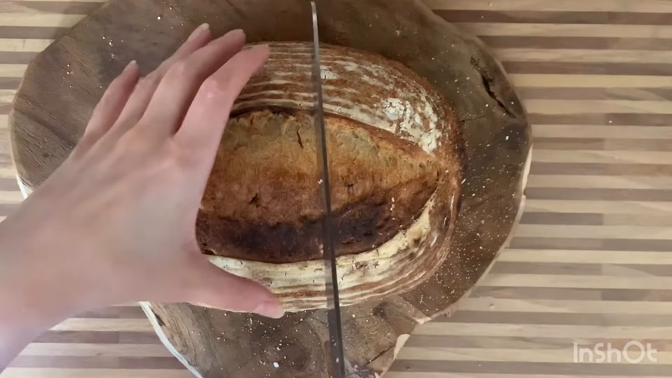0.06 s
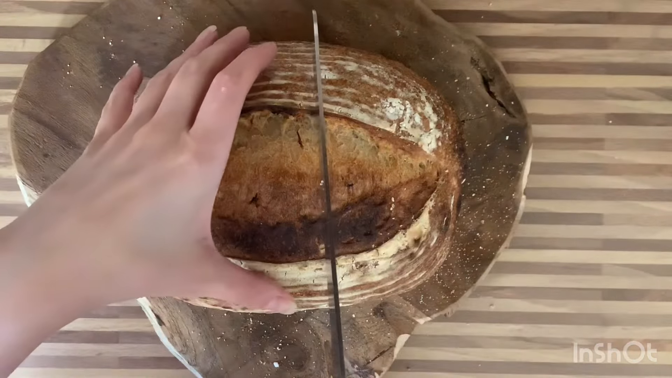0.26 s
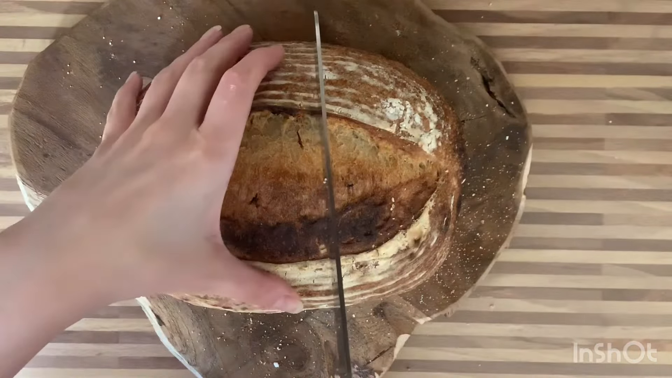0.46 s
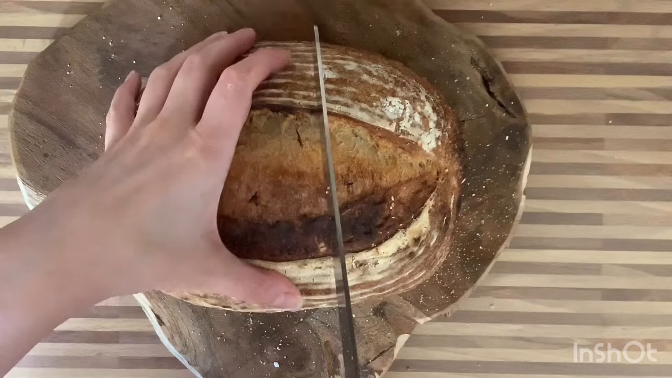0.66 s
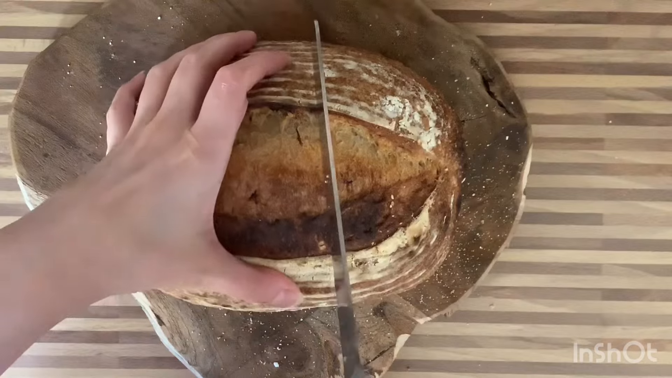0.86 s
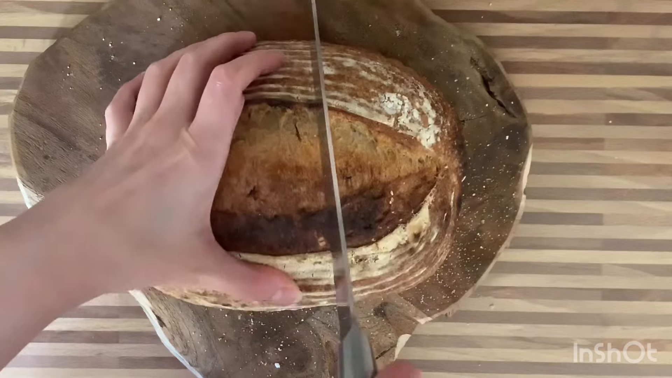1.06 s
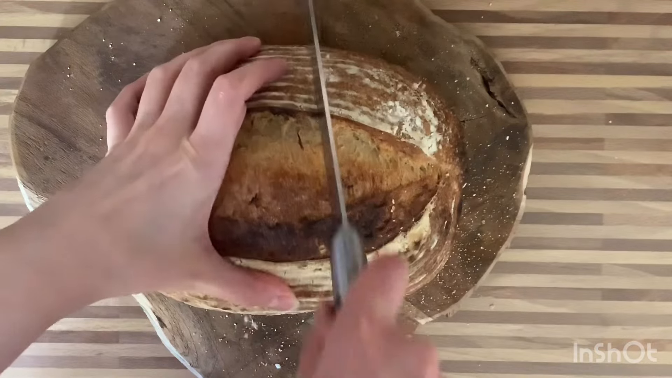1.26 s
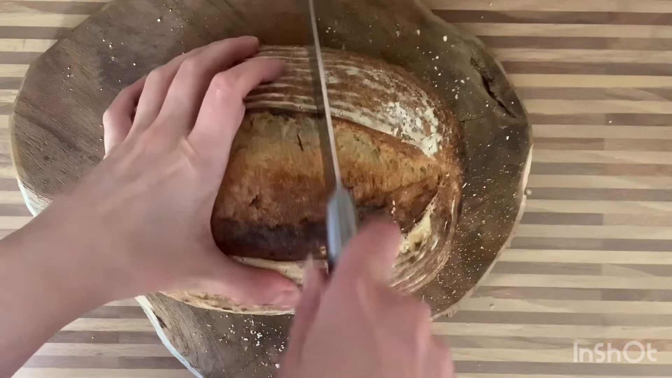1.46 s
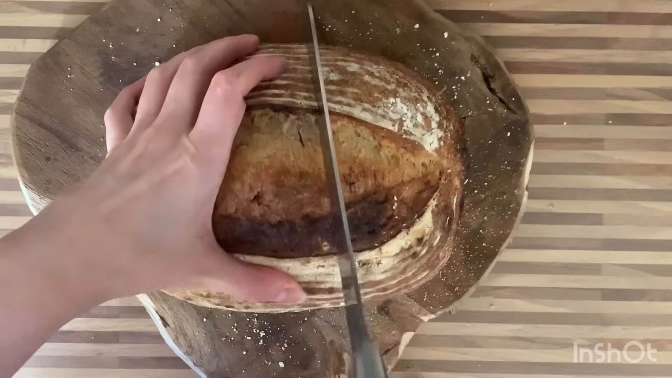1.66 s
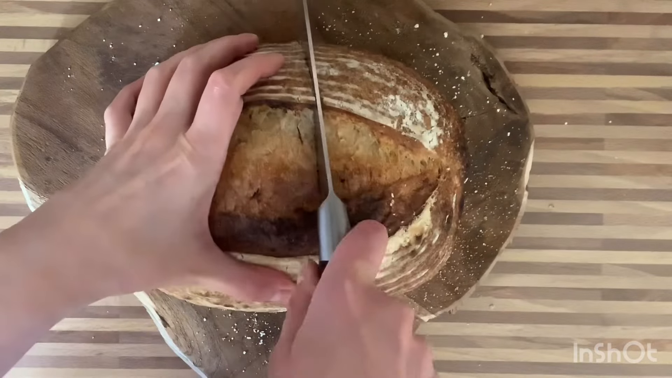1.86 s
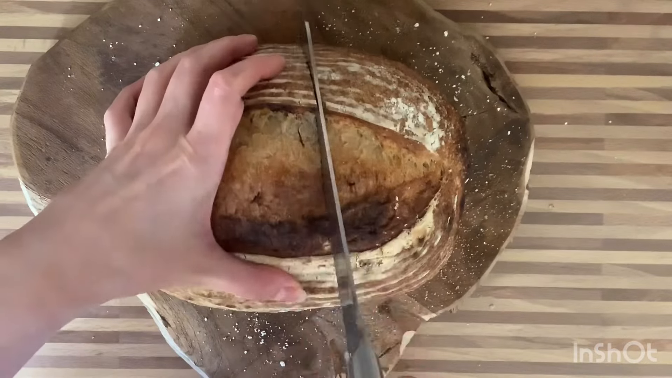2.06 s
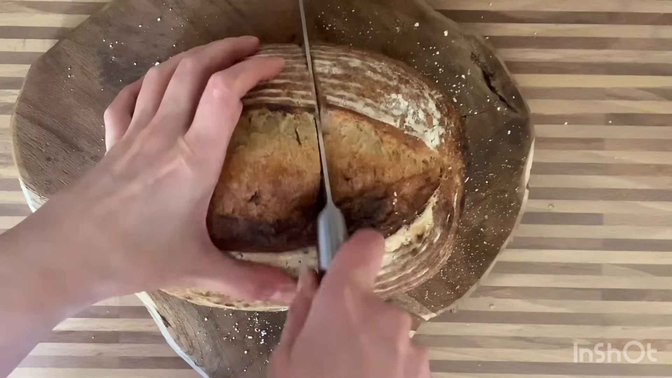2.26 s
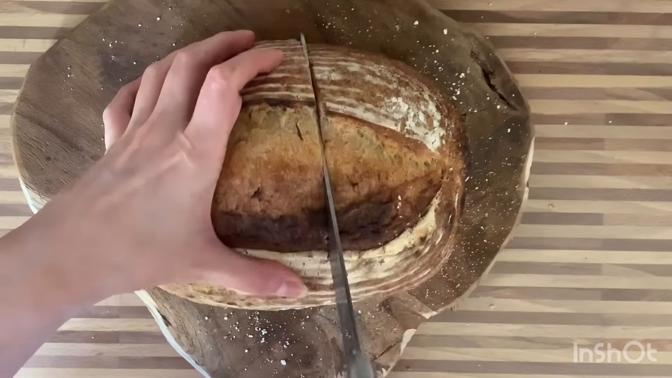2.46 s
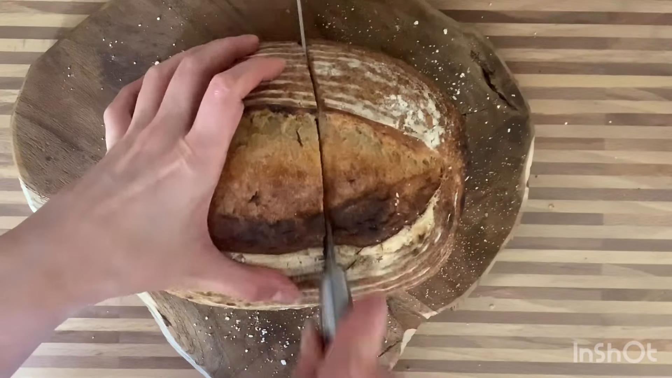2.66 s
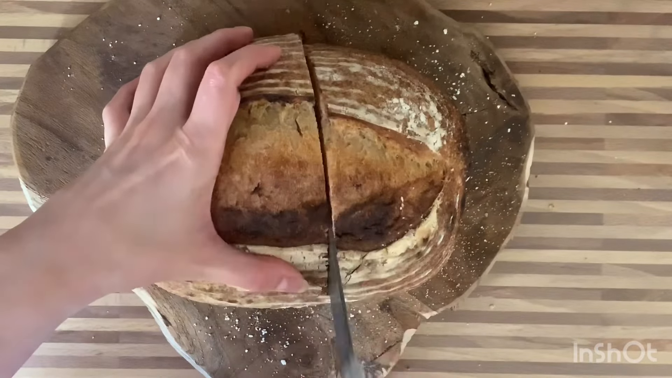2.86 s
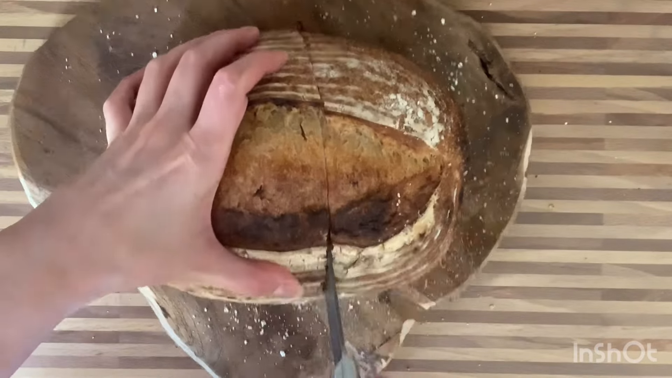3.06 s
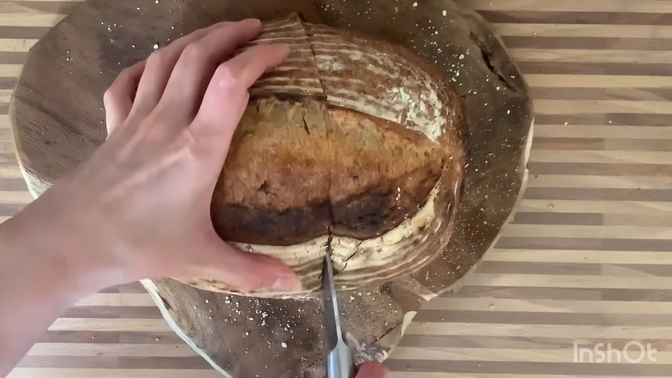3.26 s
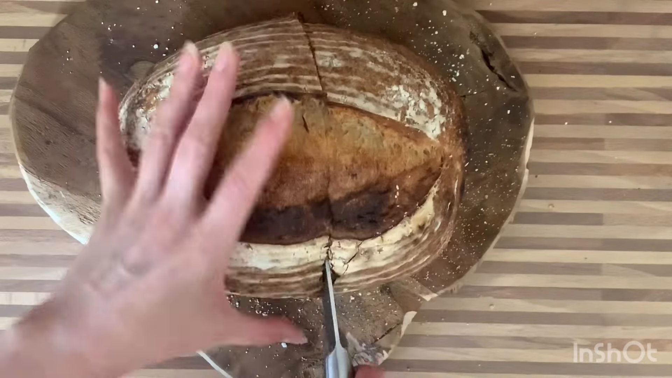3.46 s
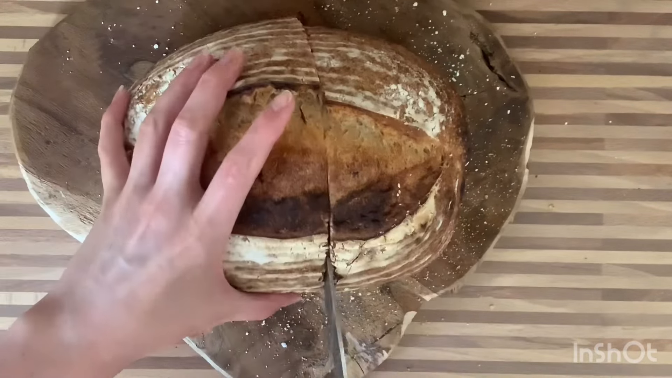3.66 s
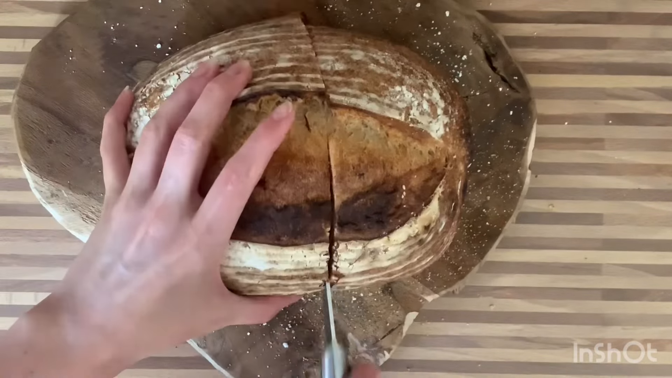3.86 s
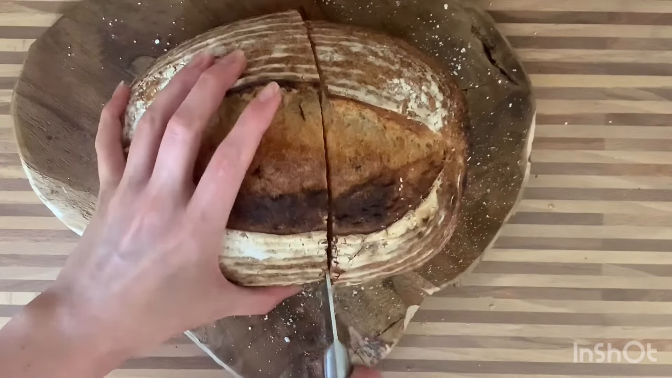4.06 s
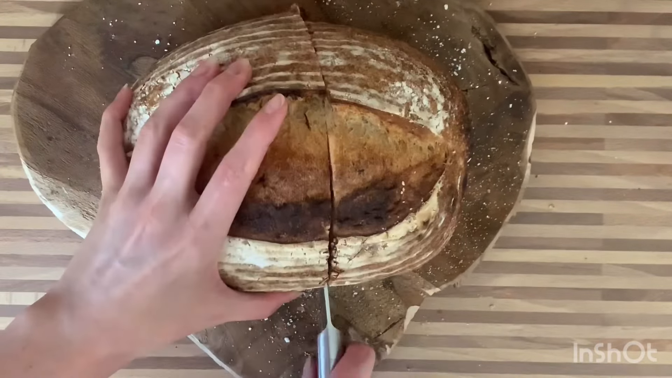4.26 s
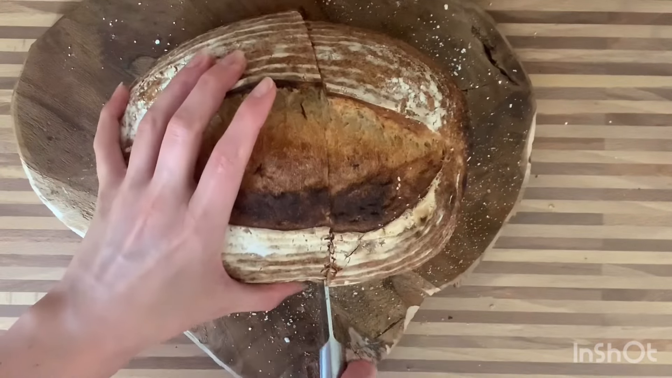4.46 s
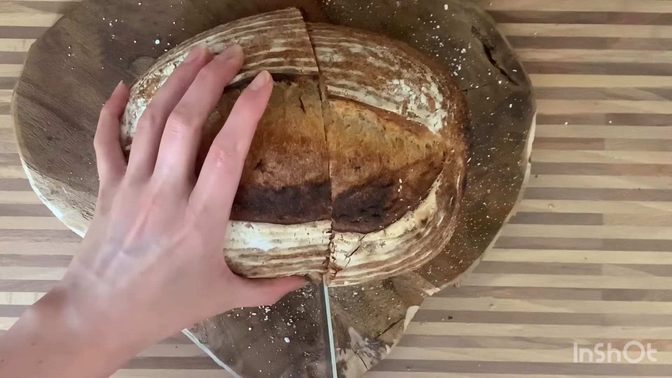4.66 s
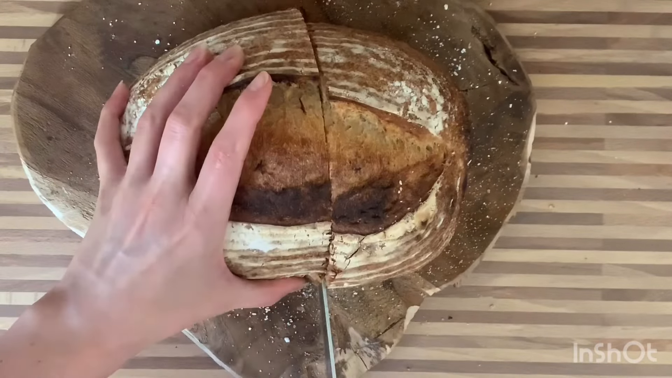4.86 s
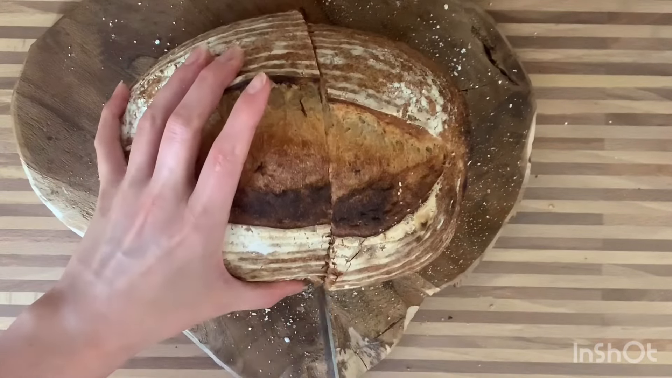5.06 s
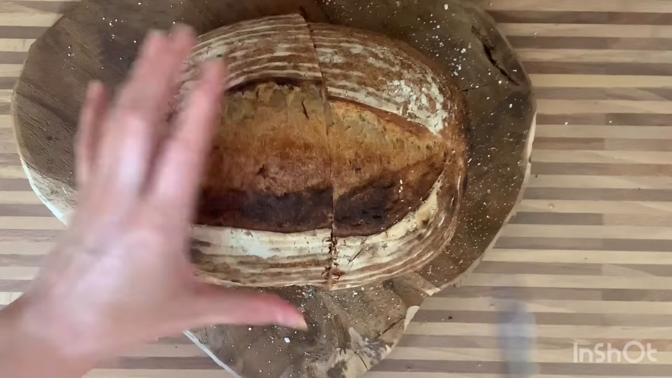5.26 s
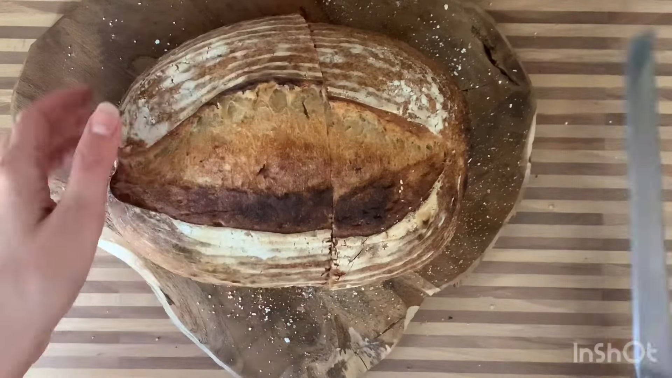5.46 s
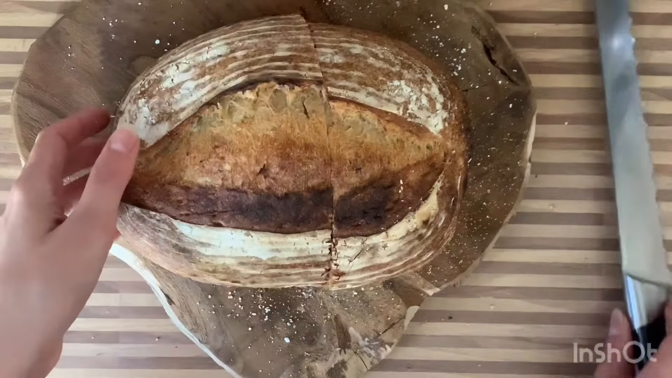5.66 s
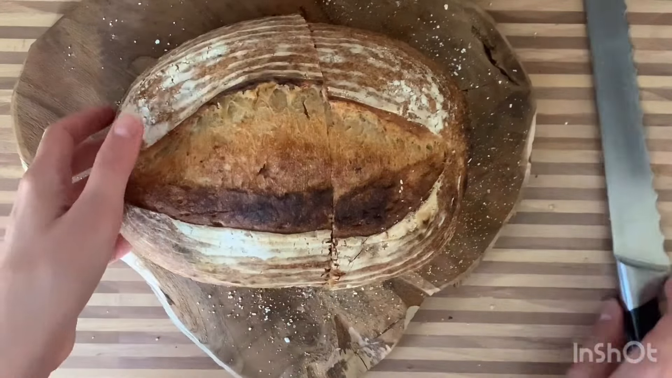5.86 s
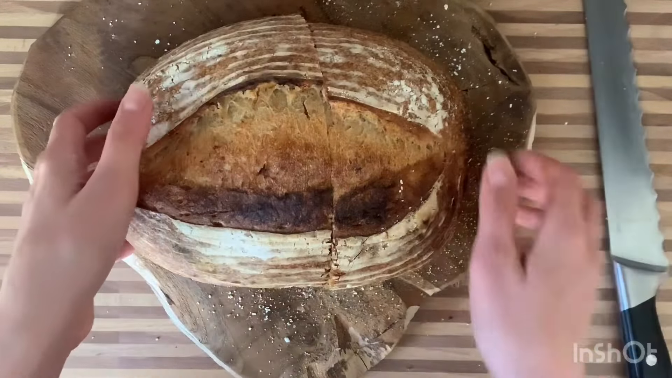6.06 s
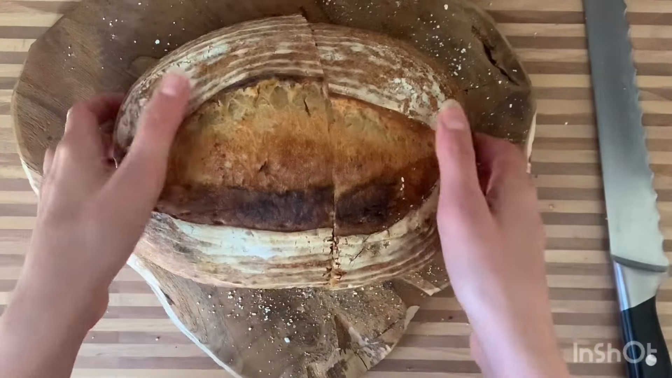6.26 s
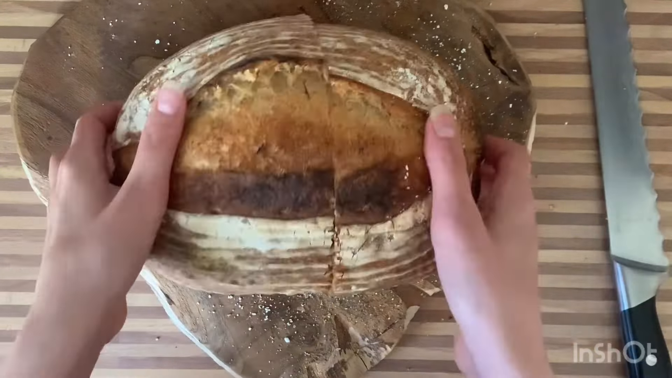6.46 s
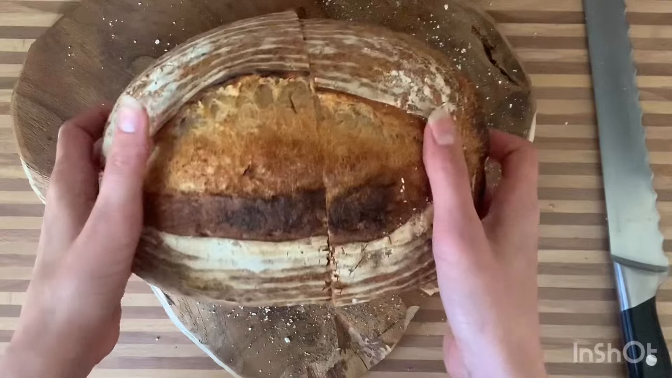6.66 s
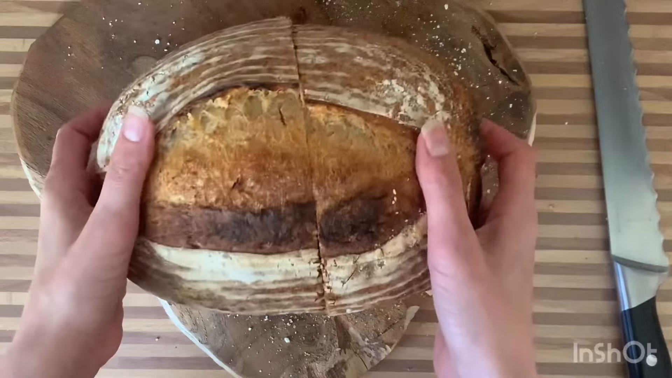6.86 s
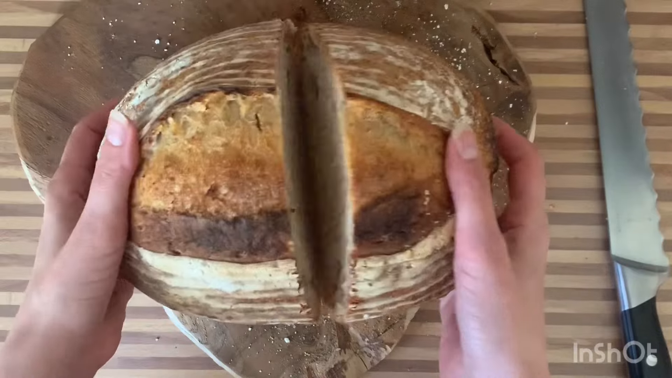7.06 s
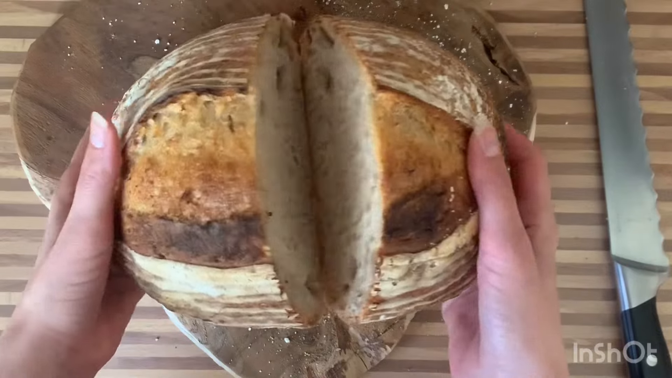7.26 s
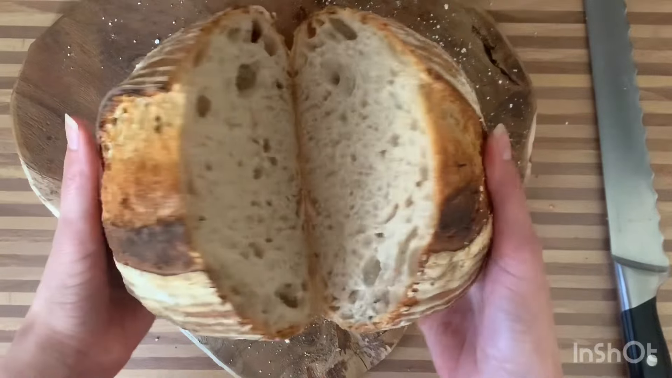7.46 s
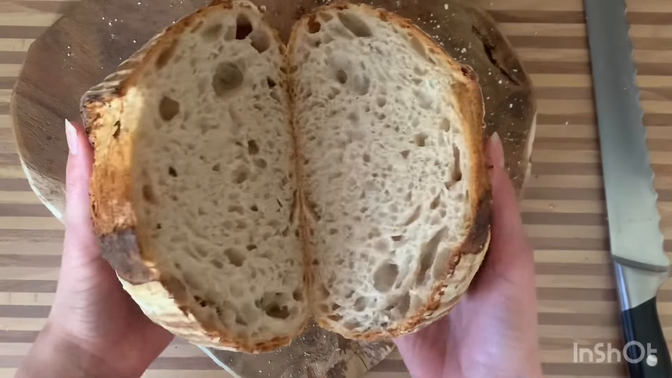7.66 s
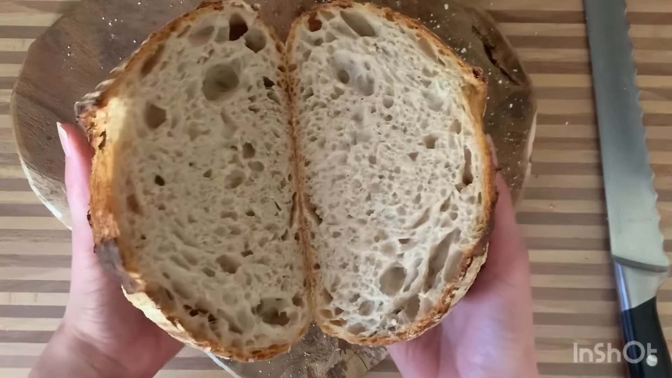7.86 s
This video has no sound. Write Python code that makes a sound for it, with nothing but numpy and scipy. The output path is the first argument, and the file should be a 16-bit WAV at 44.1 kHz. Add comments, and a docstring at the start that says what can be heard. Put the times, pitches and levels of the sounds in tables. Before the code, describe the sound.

A serrated knife saws through a crackling bread crust on a wooden board, clatters down on the worktop, then the loaf is softly pulled apart.

```python
"""A serrated knife saws through a crusty loaf on a wooden board in a kitchen.
Bursts of random clicks splinter the crust, ring the blade faintly and shake the loaf, which thuds.
The knife is laid on the worktop with a clatter of clicks fed into steel and wood tones.
Then two hands pull the halves apart: soft filtered noise with small crackles.
Echoes, a quiet background hush and a pair of close microphones complete the sound."""
import sys
import numpy as np
from scipy import signal
from scipy.fft import rfft, irfft
from scipy.io import wavfile
from scipy.ndimage import uniform_filter1d

SR = 44100
rng = np.random.default_rng(int(sys.argv[2]) if len(sys.argv) > 2 else 0)


def waveform_to_disk(signal):
    """Save audio, clipped to [-1, 1], as 16-bit WAV at the path in sys.argv[1]."""
    frames = np.transpose(np.atleast_2d(signal))
    scaled = np.clip(frames, -1, 1) * 32767
    samples = np.round(scaled).astype(np.int16)
    wavfile.write(sys.argv[1], SR, samples)


N = 349713

# Levels in all tables are relative: the functions below mix them with further gains.
# Low rustle of the hand holding the loaf. Each row: time in seconds, level in dB.
GRIP_LEVEL = [(0, -60.5), (0.75, -54.5), (5.6, -62.5), (6.1, -52)]
# Hands take hold of the loaf, part the halves and turn them up.
# Each row: start in seconds, length in seconds, rustle level in dB, handling level in dB.
HAND_MOVES = [(6.14, 0.4, -61, -50.5), (6.31, 0.065, -47.5, -44.5), (7.16, 0.21, -58.5, -81),
              (7.28, 0.1, -55.5, -76), (7.55, 0.37, -80.5, -66)]
# Small crackles of crust under the fingers. Each row: time in seconds, level in dB.
FINGER_CRACKLES = [(5.27, -44.5), (6.301, -37.5), (7.2219, -43.5), (7.3204, -37), (7.36, -37),
                   (7.4214, -41.5), (7.465, -41), (7.5432, -40), (7.6175, -37.5), (7.7917, -42.5),
                   (7.8784, -34)]
# The blade settles on the crust before the first stroke.
# Each row: time in seconds, blade ring level in dB, level of the tap on the loaf in dB.
BLADE_TOUCHES = [(0.26, -54, -50), (0.555, -46, -46.5)]
# Soft bumps of the loaf on the board. Each row: time in seconds, level in dB.
LOAF_BUMPS = [(0.555, -38), (0.874, -24.5), (1.065, -22), (1.29, -23.5), (1.739, -20.5), (2.622, -23.5),
              (4.213, -20), (6.178, -46.5), (6.49, -42.5)]
# Pieces of crust giving way. Each row: time in seconds, level in dB.
CRUST_SNAPS = [(0.6872, -46.5), (0.8107, -28.5), (0.8706, -15.5), (0.923, -19.5), (1.0652, -15.5),
               (1.1165, -14.5), (1.1662, -14), (1.1734, -9), (1.2602, -12), (1.3749, -10.5),
               (1.4288, -15.5), (1.4847, -21.5), (1.5265, -22), (1.6025, -21.5), (1.6553, -11.5),
               (1.7886, -16.5), (2.0299, -24.5), (2.0657, -20), (2.1336, -9), (2.467, -20.5),
               (2.5323, -14.5), (3.066, -14.5), (3.123, -16.5), (3.5341, -30.5), (3.7505, -29),
               (3.8731, -16.5), (4.0071, -22.5), (4.1385, -24.5), (4.3455, -18.5), (4.358, -17),
               (4.413, -34), (4.4912, -25), (4.5492, -23.5), (4.6725, -23), (4.7402, -24), (4.8331, -21.5),
               (4.9152, -21), (4.9528, -24.5), (4.985, -20.5)]
# Pushes and pulls of the knife. Each row: start in seconds, length in seconds, crust splintering in dB,
# hollow rasp of the loaf in dB, rocking of the board in dB.
KNIFE_STROKES = [(0.72, 0.19, -51.5, -44.5, -56), (0.86, 0.14, -33.5, -30.5, -38.5),
                 (1.01, 0.11, -31, -28, -29.5), (1.14, 0.14, -22, -20.5, -28), (1.36, .17, -32, -30.5, -31),
                 (1.6, 0.15, -20.5, -20.5, -28), (1.87, 0.1, -34, -28.5, -31), (2.05, .16, -25, -23, -26),
                 (2.27, .13, -38, -32, -33.5), (2.485, 0.15, -26.5, -26, -26.5),
                 (2.72, 0.11, -40.5, -38.5, -47.5), (2.885, 0.23, -26.5, -28, -26),
                 (3.16, 0.097, -33, -34, -30.5), (3.49, 0.48, -51.5, -45.5, -45.5),
                 (3.72, 0.15, -30, -27.5, -24), (3.93, .11, -47, -39.5, -38),
                 (4.12, 0.04, -30.5, -32.5, -31.5), (4.2, 0.19, -47, -43.5, -40.5),
                 (4.31, .37, -34.5, -41.5, -44), (4.69, 0.38, -43, -39, -42.5),
                 (4.965, 0.078, -33.5, -28, -46)]
# The last strokes reach the board, then the blade slides out.
# Each row: start in seconds, length in seconds, level in dB.
BOARD_SCRAPES = [(4.56, 0.31, -44.5), (4.68, 0.077, -39.5), (4.965, 0.056, -28), (5.14, .21, -52)]
# Knife contacts. Each row: time in seconds, blade ring in dB, knock on wood in dB, steel clack in dB,
# length of the chatter in seconds.
KNIFE_CONTACTS = [(5.648, -24, -31, -27, 0.075), (5.686, -19, -30, -34.5, 0.038),
                  (5.698, -18.5, -9, -26.5, 0.017), (5.725, -19, -20.5, -27.5, 0.033),
                  (5.858, -21, -27.5, -17.5, .014)]

# Tones of the ringing blade. Each row: frequency in Hz, level in dB.
BLADE_TONES = [(3682, -10.5), (4027, 3), (5017, -5.5), (5997, 1), (7300, -3), (7494, -5), (8613, -3.5),
               (10213, 0.5), (10680, -5), (11553, -5), (12059, -9), (12900, -7.5), (15050, -7.5)]
# Tones of the loaf on its board. Each row: frequency in Hz, level in dB, time to fall 60 dB in seconds.
LOAF_TONES = [(53.6, -1, 0.48), (61.8, -3.5, 0.23), (114.7, 0.5, 0.16), (205.8, -4.5, 0.17)]
# Tones of the board under the teeth. Each row: frequency in Hz, level in dB, time to fall 60 dB in seconds.
BOARD_TONES = [(118, -4, 0.14), (230, 2, 0.088), (500, 0.5, .03), (700, 3.5, 0.016), (1577, -1, 0.029),
               (1790, -6, 0.03)]
# Tones of the knife handle on the worktop.
# Each row: frequency in Hz, level in dB, time to fall 60 dB in seconds.
WORKTOP_TONES = [(62, -14, .2), (118.4, -5.5, 0.2), (227, -0.5, 0.15), (293, 3.5, 0.39), (442, 2, 0.055),
                 (538.6, -7, 0.2), (696, -8.5, 0.13), (1098, -4.5, 0.22), (2009, -3.5, 0.22)]

# Tone colours of hands, crust, hollow loaf, knock on wood, steel clack, background hush and room.
# Each row: frequency in Hz, level in dB per Hz.
HAND_COLOUR = [(50, 8.5), (150, -5), (330, 2), (550, -16.5), (1400, -17.5), (5000, -37)]
CRUST_COLOUR = [(150, -9.5), (900, -10), (1800, 1.5), (2500, -4.5), (6500, -1), (9000, -3), (12500, 2),
                (15500, -1)]
RASP_COLOUR = [(60, -19.5), (120, 6.5), (210, -1), (270, -3), (350, 4), (480, -3.5), (780, -11.5),
               (950, -8), (1900, -16.5), (6000, -50.5)]
KNOCK_COLOUR = [(100, -17), (600, -1), (6000, -23.0)]
CLACK_COLOUR = [(200, -5.5), (1000, 2), (3500, -5.5), (6300, 4.5), (9000, -9.5), (15500, -4)]
HUSH_COLOUR = [(55, -1.5), (130, -14), (330, -21.5), (1500, -33), (15000, -35)]
ECHO_COLOUR = [(50, -16.5), (350, 11), (3000, 6.5), (15000, -6.5)]
# Kitchen reverberation. Each row: frequency in Hz, time to fall 60 dB in seconds.
ECHO_T60 = [(3000, 0.58), (14000, 0.31)]
# Microphone pair. Each row: frequency in Hz, phase in radians by which left leads right.
MIC_PHASE = [(100, 0), (750, -.9), (2300, 1.4), (3400, 1.7), (4600, np.pi), (17600, 7 * np.pi)]
# Microphone pair. Each row: frequency in Hz, left minus right level in dB.
MIC_BALANCE = [(60, -0.5), (650, -3), (3500, 0)]

# Every movement swells, sags slowly and dies away; loaf and board settle later than the crust.
ATTACK_S, SAG_DB_PER_S = 0.039, 13.5
CRUST_RELEASE_DB_PER_S, LOAF_RELEASE_DB_PER_S = 223, 152.5
BOARD_RELEASE_DB_PER_S, HAND_RELEASE_DB_PER_S = 90.5, 175
SOFT_CONTACT_HZ, CUTOFF_HZ = 450, 16000
HUSH_DB = -69


def from_db(db):
    """Turn decibels into gain."""
    return 10 ** (np.asarray(db) / 20)


def low_pass(x, order, hz):
    """Soften everything above this frequency."""
    return signal.sosfilt(signal.butter(order, hz, fs=SR, output="sos"), x)


def gain_in_time(rows):
    """Gain curve through rows of time and dB, fading to silence outside them."""
    times, levels_db = np.transpose(rows)
    t = np.arange(N) / SR
    fade = np.interp(t, [times[0] - .05, times[0], times[-1], times[-1] + .05], [0, 1, 1, 0])
    return fade * from_db(np.interp(t, times, levels_db))


def movements(rows, column, release_db_per_s):
    """Gain of a run of movements: each swells, sags while it lasts, then falls faster."""
    t, power = np.arange(N) / SR, np.zeros(N)
    for start, length, *levels_db in rows:
        near = slice(int(start * SR), int((start + length + 1) * SR))
        age = t[near] - start
        swell = np.sin(np.pi / 2 * np.clip(age / ATTACK_S, 0, 1)) ** 2
        fall_db = SAG_DB_PER_S * age + release_db_per_s * np.maximum(age - length, 0)
        power[near] += (swell * from_db(levels_db[column] - fall_db)) ** 2
    return np.sqrt(power)


def at_hz(points, hz):
    """Read a table between its rows, on a log-frequency axis."""
    f, value = np.transpose(points)
    return np.interp(np.log(np.maximum(hz, 1)), np.log(f), value)


def through(x, response):
    """Let every sample of x set off this response (convolution)."""
    return signal.oaconvolve(x, response)[:N]


def colour(x, spectrum, size=4096):
    """Minimum-phase filter with this spectrum: it only acts after the input and keeps white-noise power."""
    cepstrum = irfft(np.log(from_db(at_hz(spectrum, np.fft.rfftfreq(size, 1 / SR)))))
    # folding the cepstrum onto its first half gives the minimum-phase response
    cepstrum[1:size // 2] *= 2
    cepstrum[size // 2 + 1:] = 0
    response = irfft(np.exp(rfft(cepstrum)))
    return through(x, response / np.linalg.norm(response))


def ringing(modes):
    """A struck object: one second of decaying sines with random phases, unit energy."""
    t = np.arange(SR) / SR
    response = np.zeros(SR)
    for hz, db, t60 in modes:
        decay = from_db(db - 60 * t / t60)
        response += decay * np.sin(2 * np.pi * hz * t + rng.uniform(0, 2 * np.pi))
    return response / np.linalg.norm(response)


def drift(per_s):
    """Random values, this many a second, joined by straight lines."""
    knots = rng.standard_normal(N // 10)
    return np.interp(np.arange(N) / SR * per_s, np.arange(len(knots)), knots)


def fractures(per_s, size_db, clump_db, clumps_per_s, even_s):
    """Random clicks of uneven size, in clumps, evened to about rms 1 over even_s seconds."""
    sizes = from_db(size_db * np.minimum(rng.exponential(1, N), 5) + clump_db * drift(clumps_per_s))
    clicks = sizes * rng.choice([-1, 1], N) * (rng.random(N) < per_s / SR)
    power = uniform_filter1d(clicks ** 2, max(int(even_s * SR), 1))
    return clicks / np.sqrt(np.abs(power) + 1e-6)


def cascades(times, levels_db, lengths, per_s, size_db=3, size=8192):
    """Each event is a first click and a dying run of others; longer runs carry more energy."""
    out, t = np.zeros(N + size), np.arange(size) / SR
    for start, db, length in np.broadcast(times, levels_db, lengths):
        run = from_db(size_db * rng.exponential(1, size)) * rng.choice([-1, 1], size)
        run *= (rng.random(size) < per_s / SR) * np.exp(-t / length)
        run[0] = 2
        at = int(start * SR)
        out[at:at + size] += from_db(db) * run / np.linalg.norm(run) * np.sqrt(length * SR / 2)
    return out[:N]


def scatter(x, t60, flake_db, count=12, size=1024):
    """Cracks fall on different flakes, each rattling for some milliseconds around its own pitch."""
    flake = rng.integers(0, count, N)[np.arange(N) // 128]  # a fresh choice every 128 samples
    out = np.zeros(N)
    for k, hz in enumerate(np.geomspace(1200, 14000, count)):
        rattle = rng.standard_normal(size) * from_db(-60 * np.arange(size) / SR / t60)
        rattle += from_db(flake_db) * signal.lfilter(*signal.iirpeak(hz, 2, fs=SR), rattle)
        out += through(x * (flake == k), rattle / np.linalg.norm(rattle))
    return out


def blade(clicks, t60, tilt_db=0):
    """Steel rings, high modes more briefly; tilt in dB per octave rises when the crumb damps the low ones."""
    lowest = BLADE_TONES[0][0]
    modes = [(hz, db + tilt_db * np.log2(hz / lowest), t60 * np.sqrt(lowest / hz))
             for hz, db in BLADE_TONES]
    return through(clicks, ringing(modes))


def background_hush():
    """Steady, mostly low noise of the quiet kitchen."""
    return from_db(HUSH_DB) * colour(rng.standard_normal(N), HUSH_COLOUR)


def hands():
    """Fingers hold and rub the loaf as filtered noise; the last crust between the halves tears in clicks."""
    rustle = movements(HAND_MOVES, 0, HAND_RELEASE_DB_PER_S)
    handling = movements(HAND_MOVES, 1, HAND_RELEASE_DB_PER_S)
    times, level_db = np.transpose(FINGER_CRACKLES)
    ticks = cascades(times, level_db - 3.5, 0.0035, per_s=6500)
    flakes = rustle * fractures(per_s=1000, size_db=4.5, clump_db=-1, clumps_per_s=33, even_s=0.027)
    crackle = colour(scatter(ticks + flakes, t60=0.02, flake_db=3), CRUST_COLOUR)
    rubbing = (handling + gain_in_time(GRIP_LEVEL)) * colour(rng.standard_normal(N), HAND_COLOUR)
    return low_pass(crackle, 1, 9000) + rubbing


def touches():
    """The blade taps the hollow loaf and rings; the crust damps its low modes."""
    times, ring_db, tap_db = np.transpose(BLADE_TOUCHES)
    ring = blade(cascades(times, ring_db, 0.011, per_s=2100), t60=0.21, tilt_db=13.5)
    tap = colour(cascades(times, tap_db, 0.013, per_s=900), RASP_COLOUR)
    return ring + tap


def bumps():
    """The soft loaf meets the board: a cushioned push into its low modes."""
    times, db = np.transpose(LOAF_BUMPS)
    contact = cascades(times, db + 5, 0.015, per_s=480)
    push = low_pass(contact + 1e-18, 2, SOFT_CONTACT_HZ)
    return through(push, ringing(LOAF_TONES))


def sawing():
    """Teeth splinter the crust; the fractures also shake the blade and the hollow loaf."""
    crunch = movements(KNIFE_STROKES, 0, CRUST_RELEASE_DB_PER_S)
    rasp = movements(KNIFE_STROKES, 1, LOAF_RELEASE_DB_PER_S)
    rock = movements(KNIFE_STROKES, 2, BOARD_RELEASE_DB_PER_S)
    scrape = movements(BOARD_SCRAPES, 0, LOAF_RELEASE_DB_PER_S)
    times, level_db = np.transpose(CRUST_SNAPS)
    teeth = fractures(per_s=1600, size_db=2.5, clump_db=3, clumps_per_s=130, even_s=0.053)
    snaps = cascades(times, level_db - 8, 0.0073, per_s=2800)
    cracks = scatter(from_db(-2.5) * crunch * teeth + snaps, t60=0.01, flake_db=9.5)
    crust = colour(cracks, CRUST_COLOUR) + from_db(-14.5) * blade(cracks, t60=0.093, tilt_db=1.0)
    # the blade sticks and slips in the crumb, pushing loaf and board about
    drag = fractures(per_s=900, size_db=2, clump_db=7.5, clumps_per_s=32, even_s=0.035)
    shaking = rasp * from_db(-10.0) * (teeth + drag)
    loaf = colour(shaking + from_db(-9.5) * snaps, RASP_COLOUR)
    rocking = through(drag, ringing(LOAF_TONES))
    # even out the rocking over a tenth of a second, so the strokes set its level
    rocking /= np.sqrt(np.abs(uniform_filter1d(rocking ** 2, SR // 10)) + 1e-6)
    board = scrape * through(teeth, ringing(BOARD_TONES))
    return crust + loaf + from_db(-4) * rock * rocking + board


def knife():
    """Steel and handle chatter as the knife is laid on the worktop: clicks set off ring, wood and clack."""
    times, ring_db, knock_db, clack_db, length = np.transpose(KNIFE_CONTACTS)
    ring = blade(cascades(times, ring_db, length, per_s=700), t60=0.19)
    knocks = cascades(times, knock_db, length, per_s=740)
    wood = from_db(-2.5) * through(knocks, ringing(WORKTOP_TONES))
    wood += from_db(-8.5) * colour(knocks, KNOCK_COLOUR)
    clacks = cascades(times, clack_db, length, per_s=3600)
    return ring + wood + colour(scatter(clacks, t60=0.045, flake_db=-1.5), CLACK_COLOUR)


def near_echoes(x, t60, size=1024):
    """First reflections from board, hands and worktop: short noise tails, different at each microphone."""
    tails = rng.standard_normal((2, size)) * from_db(-60 * np.arange(size) / SR / t60)
    return np.array([through(x, tail / np.linalg.norm(tail)) for tail in tails])


def kitchen(x, size=32768):
    """Diffuse reflections, different at each microphone: bands of decaying noise, the treble dying first."""
    t, edges = np.arange(size) / SR, np.geomspace(40, 18000, num=9)
    sides = []
    for white in rng.standard_normal((2, size)):
        tail = np.zeros(size)
        for low, high in zip(edges, edges[1:]):
            band_filter = signal.butter(2, [low, high], "band", fs=SR, output="sos")
            t60 = at_hz(ECHO_T60, np.sqrt(low * high))
            tail += signal.sosfilt(band_filter, white) * from_db(-60 * t / t60)
        tail *= 1 - np.exp(-t / 0.002)  # soft start
        sides.append(through(x, tail / np.linalg.norm(tail)))
    return np.array(sides)


def scene():
    """All sources, close to the microphones, with near echoes, room and hush."""
    bread = touches() + sawing() + bumps() + hands()
    steel = knife()
    room = kitchen(colour(from_db(-13.5) * bread + from_db(-12.5) * steel, ECHO_COLOUR))
    hush = background_hush()
    near = from_db(-11.5) * near_echoes(bread + steel, t60=0.032)
    return bread + steel + near + room + hush


def record(dry):
    """A closely spaced stereo pair, keenest where its two sides are opposed in phase."""
    hz = np.fft.rfftfreq(N, 1 / SR)
    phase = np.interp(hz, *np.transpose(MIC_PHASE))
    left, right = rfft(signal.sosfilt(signal.butter(6, 42, "high", fs=SR, output="sos"), dry))
    # the sides differ little in the bass; in the treble, diffuse sound differs only between the nulls
    width = from_db(5) * np.abs(np.sin(np.maximum(phase, np.pi / 2))) * hz / (hz + 250)
    ripple = from_db(3.5 * np.sin(phase / 2) ** 4)
    mid, side = (left + right) / 2, (left - right) / 2 * width
    sign = np.array([[1], [-1]])  # left, right
    balance = from_db(sign * at_hz(MIC_BALANCE, hz) / 2)
    pair = ripple * (mid + sign * side) * np.exp(.5j * sign * phase) * balance
    top_cut = signal.ellip(10, .2, 70, CUTOFF_HZ, fs=SR, output="sos")
    return signal.sosfilt(top_cut, irfft(pair, N))


dry = scene()
out = record(dry)
waveform_to_disk(out)
```